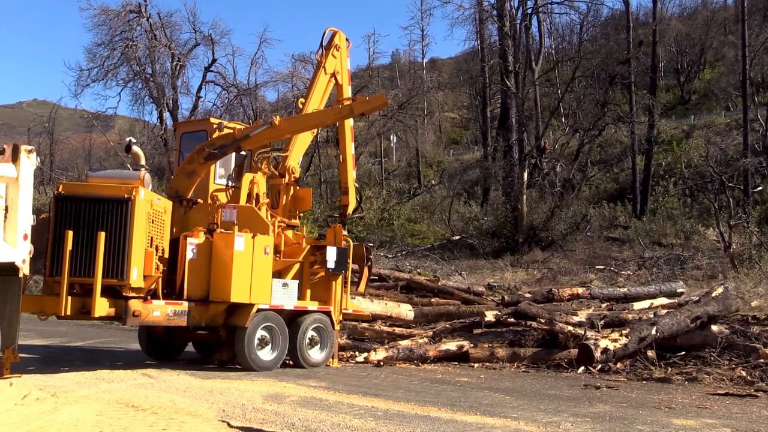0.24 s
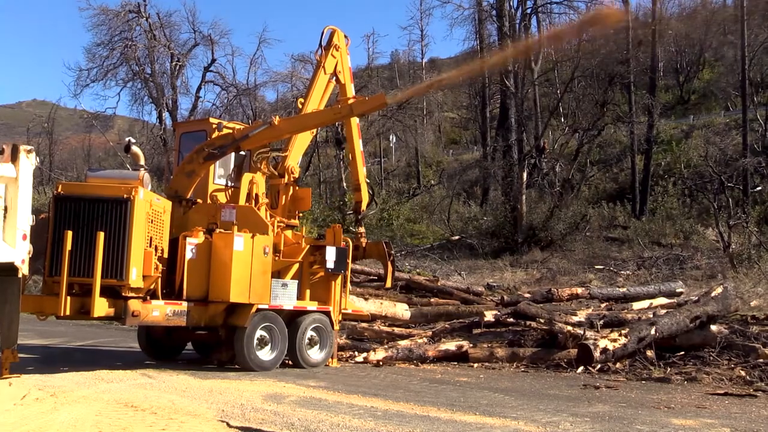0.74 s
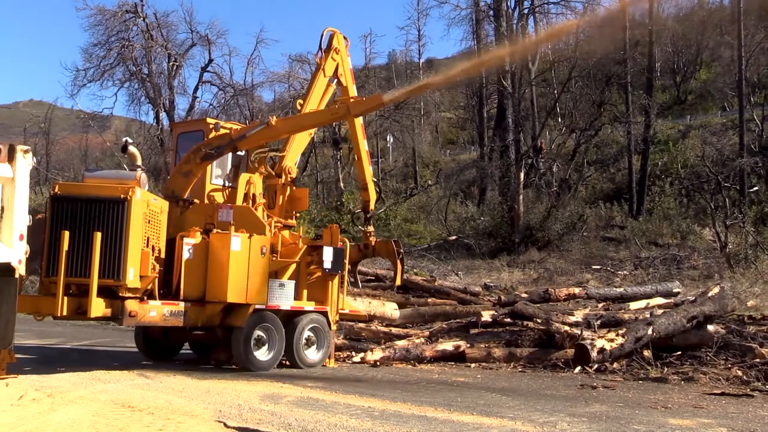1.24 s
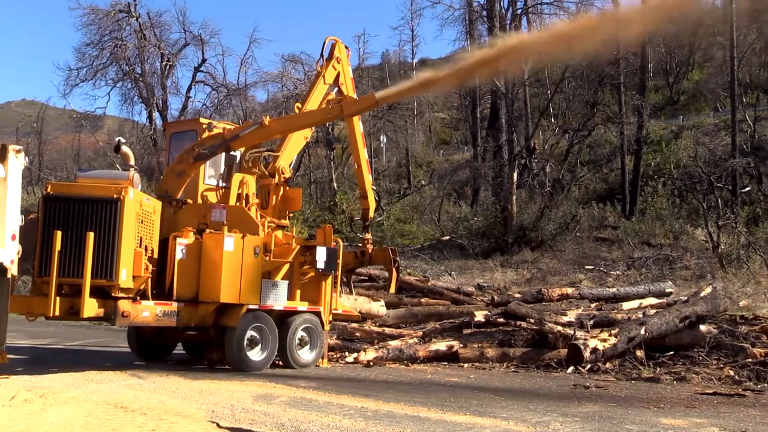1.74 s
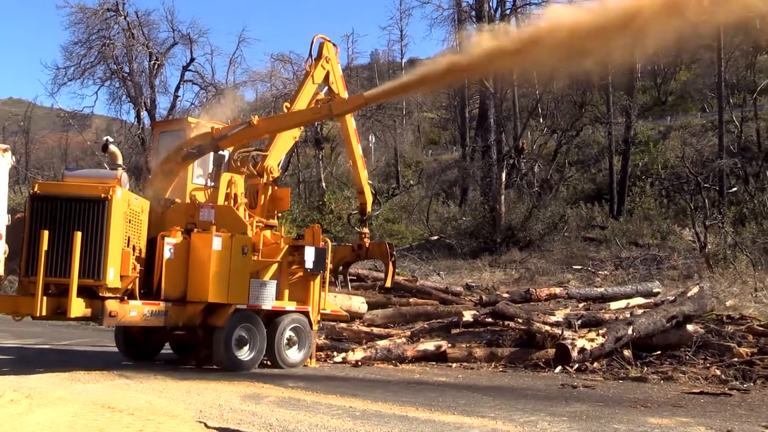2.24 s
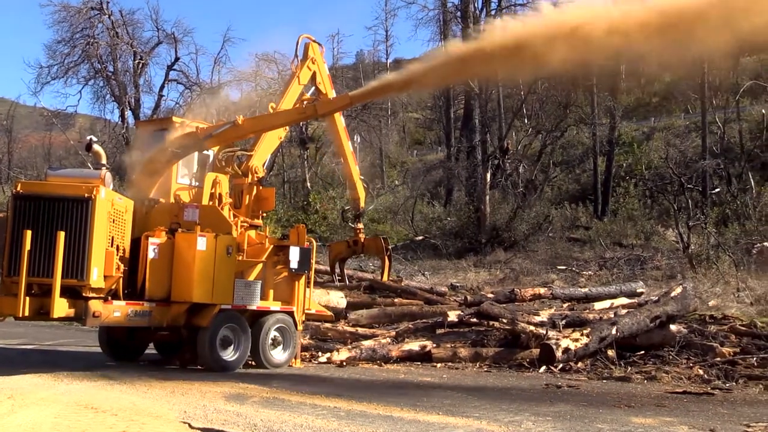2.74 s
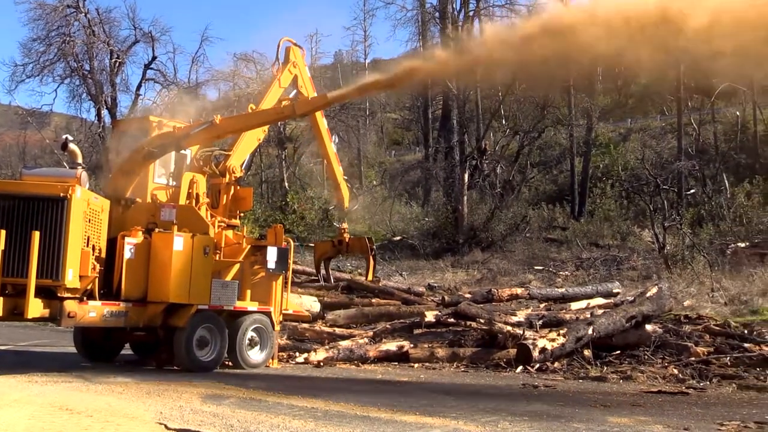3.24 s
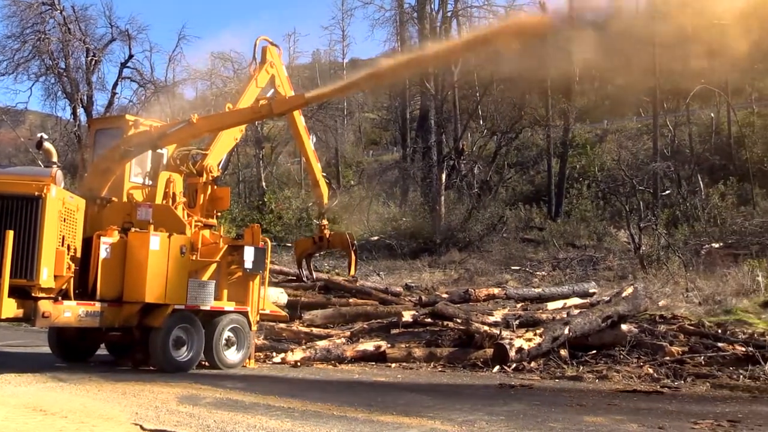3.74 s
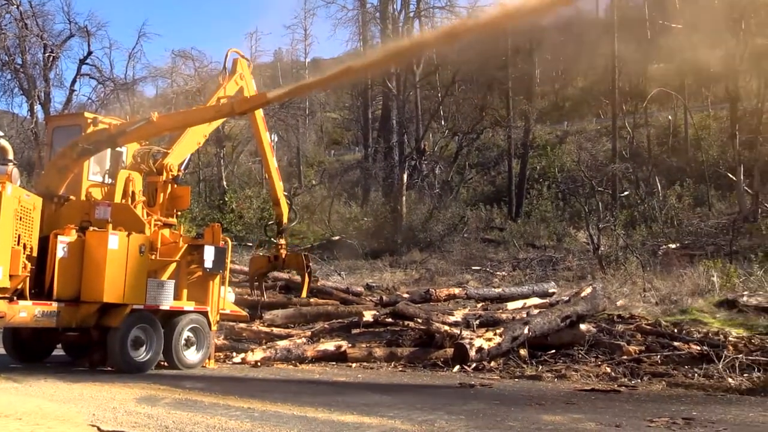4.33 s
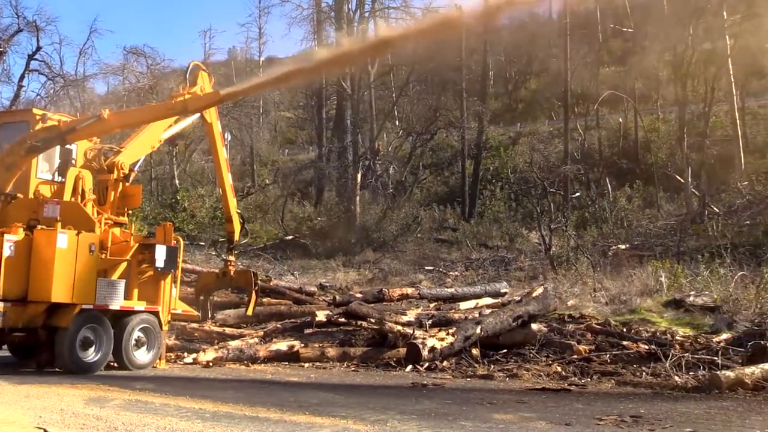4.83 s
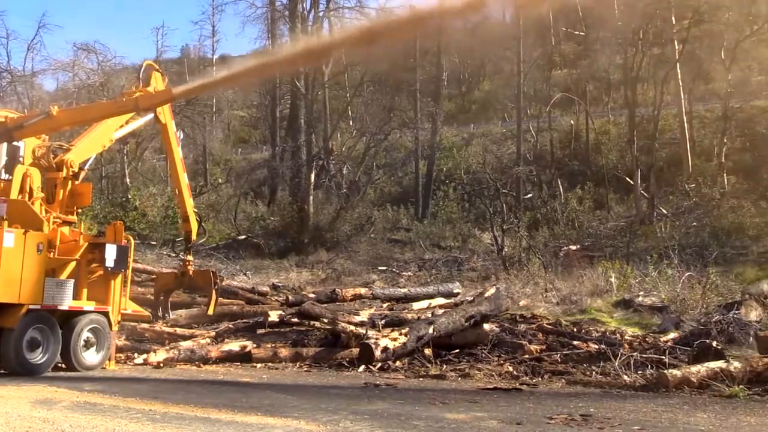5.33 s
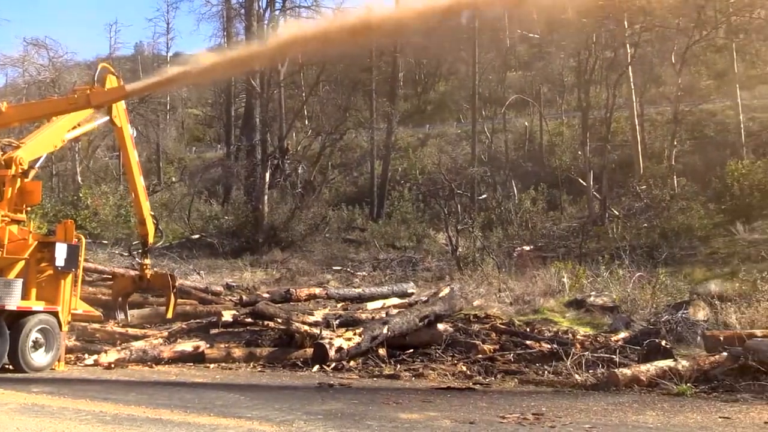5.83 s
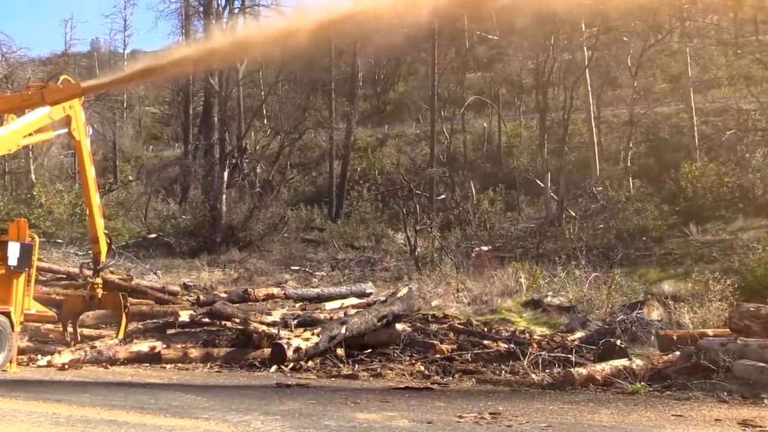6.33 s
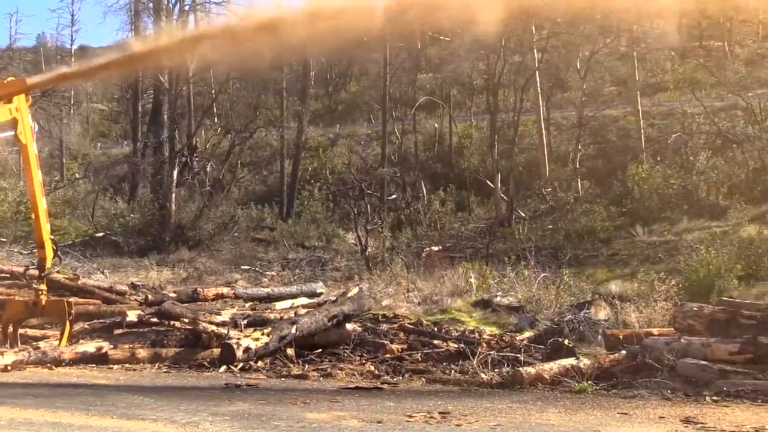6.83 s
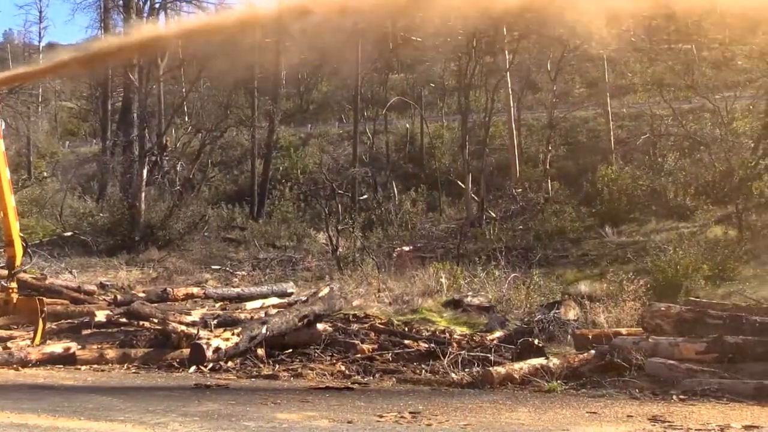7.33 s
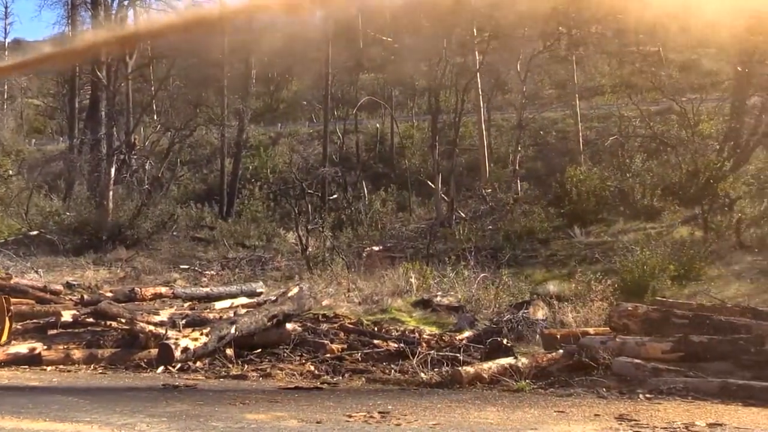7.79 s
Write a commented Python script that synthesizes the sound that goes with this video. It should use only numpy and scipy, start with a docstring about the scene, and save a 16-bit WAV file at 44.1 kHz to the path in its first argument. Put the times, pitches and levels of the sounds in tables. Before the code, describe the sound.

A heavy diesel wood chipper is already roaring at full power, outdoors and left of a stereo microphone. The sound is a dense, midrange-heavy rush of air and chips, with rapid engine throb, constant small ticks and steel rattle. At 0.3-0.5 seconds hard lumps knock the housing with short metallic rings; another clank comes near 1.75. A faint turbo whistle climbs during the first 2.7 seconds. Around 2 a low frame groan swells, and more knocks strike at 2.5-2.7. Bass fills out through the middle. From about 3 the microphone turns steadily away, the engine pitch sags, and drum growl and knife throb grow. Small clanks come near 4.5, with brief chip surges afterward. A short low groan swells at 6.5. After 7 the bass thins sharply; crisp treble bursts crackle at 7.5-8, the roar never stopping.

```python
"""Diesel wood chipper under load

Left of a stereo microphone that slowly turns away: noise streams with firing and knife throb make the roar.
Wandering tones at crankshaft orders make the engine and fan hum; blurred gliding tones, the turbo whistle.
Struck modes ring the steel housing; short tones are the frame's groans.
A wind filter, a moving high-pass with a mono bass bypass, makes the bass swell and thin."""
import sys
import numpy as np
from scipy import signal
from scipy.io import wavfile
from scipy.ndimage import uniform_filter1d

SR = 44100
rng = np.random.default_rng(int(sys.argv[2]) if len(sys.argv) > 2 else 0)


def generate_wav(sig):
    """Save sig (samples, or channels by samples) to the path in sys.argv[1] as 16-bit PCM at SR."""
    pcm = np.round(np.clip(np.atleast_2d(sig).T, -1, 1) * 32767).astype(np.int16)
    wavfile.write(sys.argv[1], SR, pcm)


N = 355313

# Engine speed. Each row: time in seconds, firings per second.
ENGINE_SPEED = [(0, 109), (.7, 107.4), (1.5, 103.5), (2, 102.1), (2.5, 101.7), (3, 102.6), (3.55, 104.3),
                (4, 102.4), (4.5, 100.8), (5, 98.8), (5.5, 96.2), (6, 93.7), (6.5, 92), (7, 90.3),
                (8.06, 86.5)]
# Microphone turn. Each row: time in seconds, share turned away 0-1.
MIC_TURN = [(0, 0.04), (2, 0.04), (3.3, 0.27), (4.3, .5), (5.2, 0.66), (6.4, 0.88), (8.06, 1)]

# Hum line pitches, in cycles per crankshaft turn.
HUM_ORDERS = [3, 3.9, 4.5, 6, 6.5]
# Hum line levels. Each row: top level in dB, loudest time in seconds, fall 2 s either side in dB, wander in Hz.
HUM_LINES = [(-69.5, 4.7, 11, 2.2), (-68.5, 1.46, 33, 1.3), (-61, 3.4, 5, 4.3), (-61, 3.1, 2, 1.6),
             (-56, 2, 3, 4)]
# Frame groans. Each row: peak time in seconds, pitch in Hz, level in dB, 1/e half-length in seconds.
GROANS = [(.75, 168, -61, 0.32), (1.3, 163, -60, .15), (2.033, 159.5, -51.5, 0.19), (2.0, 188, -55, .15),
          (4.85, 183.6, -59, .15), (6.5, 166.7, -61, .15)]
# Turbo whistles, one list each. Each row: time in seconds, pitch in Hz, level in dB.
WHISTLES = [
    [(0, 12200, -77), (.25, 12400, -75), (.5, 12700, -80), (.7, 12850, -75), (.95, 13050, -72),
     (1.2, 13450, -73), (1.5, 14100, -74), (1.75, 14700, -86)],
    [(1.45, 9100, -75), (1.6, 9300, -65), (1.75, 9600, -71), (1.9, 9950, -84), (2.1, 10400, -70),
     (2.25, 10700, -78), (2.5, 11150, -69), (2.62, 11350, -78), (2.75, 11500, -72), (3.1, 11700, -83),
     (4.5, 11600, -85)],
]

# Wood lumps knocking the housing. Each row: time in seconds, level in dB before each mode's random share.
CLANGS = [(.305, -35), (.342, -32), (.45, -37), (.483, -33), (1.746, -30), (2.515, -34), (2.6, -34),
          (2.74, -38), (4.435, -39), (4.55, -36)]
# Housing modes. Each row: pitch in Hz, level in dB re the knock, 60 dB decay time in seconds.
HOUSING_MODES = [(785, -14, .08), (1381, 3, 0.095), (1703, -1.5, 0.12), (2050, -1.5, 0.082),
                 (2424, -16, 0.066), (3240, -6, .05)]
# Sharp treble bursts, and one slight dip (negative).
# Each row: start in seconds, treble change at the start in dB, decay in seconds.
TREBLE_BURSTS = [(1.805, -1, .03), (7.544, 8, .022), (7.615, 3, .04), (7.78, 5, .015), (7.985, 5, .025)]

# Load. Each row: time in seconds, roar in dB re ROAR_DB, treble chip stream and low drum growl in dB re the roar.
LOAD = [(0, 0.5, -5, -2.5), (.3, 0, -0.5, -0.5), (1.0, 1, 1, -1), (1.4, 0, 0.5, -2), (1.7, -0.5, 0.5, -0.5),
        (2.0, -1.1, 0, 1), (2.2, -0.3, 0.5, -0.3), (2.6, -0.5, 2, 0), (2.95, -1, -0.3, 1.5),
        (3.95, -0.1, 0.6, 2.2), (4.15, -0.5, 2.5, 3), (4.6, 0, 1.5, 3.5), (5.1, -0.7, 2, 4.5),
        (5.4, -1.4, 2, 4), (6.1, -2, 1.5, 4.5), (6.4, -0.5, 1, 1.5), (7.2, -0.85, 1.6, 3.5),
        (8.06, -0.5, 0, 3.5)]
# Knife bites, chip clumps and dips (negative). Each row: peak time in seconds, centre in Hz,
# 1/e half-width in octaves, level in dB, 1/e half-length in seconds.
SURGES = [(0.333, 1770, 1.2, 4, 0.05), (0.475, 1800, .5, 4.5, 0.04), (1.82, 9000, 2.7, 4, .04),
          (2.05, 160, 0.24, 11, 0.3), (2.53, 1900, 0.91, 3, 0.032), (2.62, 2500, 2, 1.5, 0.16),
          (1.0, 1900, 1, 0.5, 0.068), (2.165, 3000, 0.72, 2, .015), (3.65, 1500, 0.72, 3.5, .02),
          (4.723, 2600, 1.1, 2, .03), (4.827, 1500, 1.4, -2.5, 0.018), (5.22, 2000, 1.1, 2, .02),
          (7.53, 300, 0.57, -3, 0.091), (1.4, 350, .4, -1, .3), (1.7, 3280, .4, 4, 0.027),
          (1.75, 1900, .5, 0.5, 0.021), (3.426, 2500, 2.2, 1.5, 0.02), (3.697, 3200, 0.71, 0, .06),
          (3.214, 700, 0.2, 8, 0.027), (4.436, 1800, 0.33, 9, 0.012), (4.527, 700, 0.82, 3, 0.026),
          (4.997, 625, 0.3, 5, 0.03), (5.197, 536, 0.31, 6.5, 0.054), (5.805, 1970, .6, 5, 0.023),
          (6.287, 2200, 1.7, 3.5, 0.034), (6.55, 165, .3, 10, 0.091), (7.388, 2500, 1.4, 4, .015),
          (7.55, 2500, 1.3, 4, 0.022), (7.61, 2900, .8, 2.5, 0.03), (7.852, 2500, 2, -1.5, 0.017),
          (7.999, 2460, 0.5, 6.5, 0.02)]
# Roar at the two ports, per microphone direction. Each row: frequency in Hz, left level in dB re ROAR_DB,
# left minus right in dB, likeness of the ports 0-1, left lead in radians.
FACING = [(686, 1.5, 10, 0.79, 2.85), (936, 0, 13.5, 0.03, 3.9), (1030, -2.5, 4.5, 0.4, 0.24),
          (1196, -1.0, 6.0, 0.24, 1.72), (1960, -1, 12, 0.42, 6), (2550, -5, 12, 0.38, 6.4),
          (3330, -6.5, 7, 0.74, 6.6), (3800, -9.5, 3.5, 0.74, 6.9), (3840, -15.5, 5, 0.59, 5.9),
          (4130, -17.5, -0.5, 0.9, 7.3), (4480, -16.5, 2, 0.56, 8.14), (5300, -18.5, 5.0, 0.64, 8.3),
          (5540, -19.5, 9, 0.6, 9.7), (5950, -18, 8, 0.5, 5.4), (6130, -21.0, 7.5, 0, 7.5),
          (8240, -25.5, 6, 0.56, 8.1), (8530, -25.5, 7, 0.4, 8.9), (9040, -26.5, 12, 0.11, 6.2),
          (9500, -30.5, 5, 0.4, 7.5), (12490, -39.5, 4.0, 0.27, 8.6), (12660, -37, 6.0, 0.13, 8.7),
          (14130, -43.0, 0.5, 0.47, 9.2), (14990, -55, -0.5, 0.27, 9.2)]
HALF_TURNED = [(705, 1.5, 12.5, 0.94, 2.85), (950, -2.5, 9.5, 0.29, 3.5), (1120, -1.0, 8.0, 0.62, 1.7),
               (1210, -0.5, 9.5, 0.79, 2.2), (1900, -2, 10.5, 0.53, 5.0), (2500, -3, 15.5, 0.28, 6.6),
               (3010, -4.5, 11, 0.61, 7), (3330, -5.0, 9, 0.55, 6.4), (3630, -8, 7.5, 0.61, 6.3),
               (4090, -16, 0.5, 0.59, 7.8), (4360, -16.5, 2.5, 0.93, 8.3), (5000, -16.0, 6, 0.67, 8.4),
               (5340, -20, 5, 0.84, 8.5), (5700, -19, 9, 0.47, 9.5), (5940, -18.0, 9.5, 0.19, 9.4),
               (6370, -21, 9, 0.27, 7.5), (8530, -22.5, 9.0, 0.43, 8.4), (8870, -22, 11.5, 0.13, 9.1),
               (9600, -29.5, 5.0, 0.38, 8.3), (12400, -37, 2.0, 0.48, 9.5), (13090, -36.0, 4.0, 0.4, 9.5),
               (13610, -40.0, 1.5, 0.39, 9.5), (14990, -48.0, -0.5, 0.08, 9.5)]
TURNED = [(686, -1.5, 8, 0.92, 2.97), (1030, -4, 9.5, 0.89, 1.9), (1290, 0, 6, 0.92, 3.1),
          (1610, -5, 6.5, 0.78, 3.05), (1870, -2, 7.5, 0.77, 4.3), (2330, -2.5, 17.5, 0.11, 2.9),
          (2760, -3.0, 14, 0.41, 9.4), (2900, -3, 14, 0.8, 7.1), (3530, -7.5, 12.5, 0.55, 8),
          (3930, -11.5, 2, 0.95, 8.1), (4560, -15, 2.5, 0.88, 9.2), (5700, -21.5, 2.0, 0.86, 9.8),
          (6060, -17, 8, 0.77, 10.7), (6700, -22, 9.5, 0.65, 10.8), (7100, -17.5, 11, 0.6, 9.7),
          (8760, -23, 9, 0.59, 10), (9470, -27, 7.0, 0.49, 9.8), (10420, -31, 8.0, 0.54, 9.9),
          (10850, -34.0, 4.0, 0.45, 9.0), (11200, -37, -3, 0.41, 11), (11890, -35.5, 0, 0.41, 11.1),
          (14470, -45, 1, 0.28, 12.6), (14990, -46.5, 1.0, 0.54, 12.6)]
# Low end shared by all three directions, same columns.
BASS = [(80, -33, 1.1, .65, .9), (119, -34, 3, .7, 2.02), (155, -8, 4.2, 0.83, 1.4),
        (201, -16, 7.2, 0.73, 2.86), (351, -13, 6.6, 0.95, 2.1), (565, -3, 7.8, 0.88, 2.24)]

# Wind filter. Each row: time in seconds, left and right corners in octaves above 100 Hz, mono bass in dB.
WIND_CUT = [(0, 2.53, 2.56, -17), (.45, 2.35, 2.28, -14.5), (1.1, 2.08, 1.8, -12), (1.67, 1.8, 1.54, -10.5),
            (2.58, 1.48, 0.95, -9.5), (3.45, 1.2, 0.81, -11), (4.08, 0.85, 1, -13), (5.3, 0.59, 1.03, -14),
            (6.66, 1.6, 1.1, -11), (7.18, 2.53, 2.3, -18), (7.62, 2.48, 2.15, -17.5)]
# Colour of the mono bass. Each row: frequency in Hz, level in dB re the mono bass, phase in radians.
BYPASS = [(40, -1, -0.29), (101, 6.5, 0.97), (175, -0.5, 0.3), (280, 6, 0.12), (418, -3.5, -0.79),
          (770, -21, -0.96)]

HOP, FRAME = 256, 1024  # samples
HUM_PAN_DB, HUM_LEAD_RAD = 11, 0.95  # left minus right, left leads
HUM_STEADY = 7  # steady part over wandering part
FAN_OVERTONE_DB, FAN_TURNED_DB = -56, -14  # level, change at full turn
LUMPS_PER_S, LUMPS_DB = 60, -49.5  # small lumps: rate, lowest level before each mode's random share
KNIFE_HZ, KNIFE_DEPTH_FACING, KNIFE_DEPTH_TURNED = 23.2, .03, .09  # depths are rms
KNOCK_ABOVE_HZ, KNOCK_DEPTH, KNOCK_DECAY_FIRINGS = 4000, 0.27, .12  # treble burst per firing
ROAR_DB = -23.5
FLUTTER = 0.02  # rms share by which moving air shakes the lead between ports
STEP_S = 0.15  # slide between wind filter settings
EDGE_HZ = 15600


def gain_of(db):
    """Decibels to amplitude."""
    return 10 ** (np.asarray(db) / 20)


def evened(x):
    """Scales to rms 1."""
    return x / np.sqrt(np.mean(abs(x) ** 2) + 1e-20)


def columns(rows, at, warp=lambda v: v):
    """Every column after the first, interpolated at the given places."""
    key, *rest = np.transpose(rows)
    return np.array([np.interp(warp(at), warp(key), c) for c in rest])


def steps(rows, at):
    """Every column after the first, held from row to row with a quick slide between."""
    rows = np.array(rows)
    slid = np.clip((at - rows[1:, :1]) / STEP_S + .5, 0, 1)
    return rows[0, 1:, None] + np.diff(rows[:, 1:], axis=0).T @ slid


def to_frames(x):
    """Frequencies, times and short-time spectrum."""
    return signal.stft(x, SR, nperseg=FRAME, noverlap=FRAME - HOP)


def to_sound(z):
    """Short-time spectra back to samples."""
    return signal.istft(z, SR, nperseg=FRAME, noverlap=FRAME - HOP)[1][..., :N]


def wavering(hz, blur_hz, steady=2.5):
    """Complex tone along the curve hz, real part of rms 1; narrowband noise makes level and phase wander."""
    r = np.exp(-np.pi * blur_hz / SR)
    noise = rng.standard_normal(N) + 1j * rng.standard_normal(N)
    wander = evened(signal.lfilter([1], [1, -2 * r, r * r], noise))
    carrier = np.exp(2j * np.pi * np.cumsum(hz) / SR)
    return np.sqrt(2) * evened((steady + wander) * carrier)


def groans(t):
    """Frame groans under load: short tones with Gaussian swell and fade."""
    out = 0
    for at, hz, db, long in GROANS:
        out = out + gain_of(db) * np.sqrt(2) * np.exp(2j * np.pi * hz * t - ((t - at) / long) ** 2)
    return out


def hum(t):
    """Crankshaft orders of exhaust and cooling fan, three firings a turn, plus the groans."""
    shaft_hz = columns(ENGINE_SPEED, t)[0] / 3
    left = groans(t)
    for order, (top_db, at, fall_db, blur_hz) in zip(HUM_ORDERS, HUM_LINES):
        level_db = top_db - fall_db * ((t - at) / 2) ** 2
        left = left + gain_of(level_db) * wavering(order * shaft_hz, blur_hz, steady=HUM_STEADY)
    right = gain_of(-HUM_PAN_DB) * np.exp(-1j * HUM_LEAD_RAD) * left
    return np.array([left, right]).real


def fan_overtone(t):
    """Fan tone tied to engine speed, shaded as the microphone turns away."""
    db = FAN_OVERTONE_DB + FAN_TURNED_DB * columns(MIC_TURN, t)[0]
    return gain_of(db) * wavering(columns(ENGINE_SPEED, t)[0] * 13 / 3, 2.5).real


def turbo(t):
    """Turbocharger spool-up: blurred climbing whistles, the upper one a broad hiss."""
    out = np.zeros(N)
    for rows, blur_hz in zip(WHISTLES, (280, 85)):
        hz, db = columns(rows, t)
        sounding = (t >= rows[0][0]) * (t <= rows[-1][0])
        out += gain_of(db) * sounding * wavering(hz, blur_hz, .2).real
    return out


def housing():
    """Large knocks and a patter of small lumps ring the steel; each hit excites each mode by chance."""
    patter_db = LUMPS_DB + 2.9 * np.minimum(rng.exponential(1, N), 3)
    lumps = (rng.random(N) < LUMPS_PER_S / SR) * gain_of(patter_db)
    for at, db in CLANGS:
        lumps[round(at * SR)] = gain_of(db)
    where = np.flatnonzero(lumps)
    t = np.arange(6000) / SR
    onset = np.minimum(t / .003, 1)
    out = np.zeros(N)
    for hz, db, t60 in HOUSING_MODES:
        hits = np.zeros(N)
        hits[where] = lumps[where] * rng.uniform(0.21, 1.8, len(where))
        ring = gain_of(db - 60 * t / t60) * onset * np.sin(2 * np.pi * hz * t)
        out += signal.oaconvolve(hits, ring)[:N]
    return out


def clatter(t):
    """Two unrelated streams of rushing air and chips ticking on steel, throbbing with firings and drum."""
    firing_phase = np.cumsum(columns(ENGINE_SPEED, t)[0]) / SR % 1
    away = columns(MIC_TURN, t)[0]
    chop_depth = KNIFE_DEPTH_FACING + away * (KNIFE_DEPTH_TURNED - KNIFE_DEPTH_FACING)
    chop = chop_depth * wavering(KNIFE_HZ + 0 * t, 3.1, steady=1).real
    throb = 1 + 0.13 * np.exp(-firing_phase / 0.5) + chop

    ticks = gain_of(2.55 * np.minimum(rng.exponential(1, (2, N)), 4))
    ticks = ticks * (rng.random((2, N)) < 2500 / SR)  # ticks per second
    ticks = ticks * rng.choice([-1., 1.], (2, N))
    air = rng.standard_normal((2, N))
    streams = throb * (air + 0.3 * evened(ticks))

    high_pass = signal.butter(2, KNOCK_ABOVE_HZ, "high", fs=SR, output="sos")
    treble = signal.sosfilt(high_pass, streams)
    knock = np.exp(-firing_phase / KNOCK_DECAY_FIRINGS)
    bursts = 0
    for at, db, decay in TREBLE_BURSTS:
        bursts = bursts + (gain_of(db) - 1) * (t > at) * np.exp(-abs(t - at) / decay)
    return streams + (KNOCK_DEPTH * (knock - knock.mean()) + bursts) * treble


def load_db(hz, s):
    """Level over pitch and time: chips rule the treble and come in clumps, the drum rules the low end."""
    roar_db, chips_db, growl_db = columns(LOAD, s)
    octave = np.log2(hz[:, None] + 1)
    treble = np.clip(octave - np.log2(2500), 0, 1)
    low = np.clip((np.log2(1300) - octave) / 1.2, 0, 1)
    clumps = evened(uniform_filter1d(rng.standard_normal(len(s)), size=6))
    patches = uniform_filter1d(rng.standard_normal((len(hz), len(s))), size=3, axis=0)
    patches = evened(uniform_filter1d(patches, size=8, axis=1))
    surges = 0
    for at, centre_hz, wide, db, long in SURGES:
        off_pitch = (octave - np.log2(centre_hz)) / wide
        surges = surges + db * np.exp(-off_pitch ** 2 - ((s - at) / long) ** 2)
    return ROAR_DB + roar_db + treble * (chips_db + 0.5 * clumps) + low * growl_db + 1.22 * patches + surges


def roar(t, tones):
    """Colours the streams by load and microphone direction; tones share the path to the right port."""
    hz, s, z = to_frames(clatter(t))
    away = np.clip(columns(MIC_TURN, s)[0], 0, 1)
    near, half, far = (columns(BASS + rows, hz + 1, np.log)[..., None]
                       for rows in (FACING, HALF_TURNED, TURNED))
    first_half, second_half = np.minimum(2 * away, 1), np.maximum(2 * away - 1, 0)
    left_db, pan_db, same, lead = near + first_half * (half - near) + second_half * (far - half)
    same = np.clip(same, 0, 1)
    level = gain_of(left_db + load_db(hz, s))
    tone = to_frames(tones)[2]
    flutter = evened(uniform_filter1d(rng.standard_normal(len(s)), size=30))
    across = gain_of(-pan_db) * np.exp(-1j * lead * (1 + FLUTTER * flutter))
    right_stream = same * z[0] + np.sqrt(1 - same ** 2) * z[1]
    left = level * z[0] + tone
    right = across * (level * right_stream + tone)
    return to_sound(np.array([left, right]))


def wind_filter(x):
    """Third-order high-pass per side at a moving corner, plus mono bass taken from the left."""
    hz, s, z = to_frames(x)
    *octaves, mono_db = steps(WIND_CUT, s)
    corner_hz = 100 * 2 ** np.array(octaves)[:, None]
    u = 1j * hz[:, None] / corner_hz
    high = u ** 3 / ((u + 1) * (u * u + u + 1))
    colour_db, phase = columns(BYPASS, hz + 1, np.log)[..., None]
    bass = gain_of(colour_db + mono_db) * np.exp(1j * phase) * z[0]
    return to_sound(high * z + bass)


def scene():
    """Roar, whistles, fan overtone and housing share one path; they and the hum pass the wind filter."""
    t = np.arange(N) / SR
    tones = turbo(t) + fan_overtone(t) + housing()
    return wind_filter(roar(t, tones) + hum(t))


def record(dry):
    """Soft overload, low cut, self-noise and band limit."""
    ceiling = .09
    out = dry / (1 + (dry / ceiling) ** 4) ** .25
    out = signal.sosfilt(signal.butter(2, 70, "high", fs=SR, output="sos"), out)
    rumble = signal.lfilter([1], [1, -.985], rng.standard_normal((2, N)))
    out = out + gain_of(-85) * evened(rumble)
    band_limit = signal.firwin(511, EDGE_HZ, window=("kaiser", 9), fs=SR)
    return signal.oaconvolve(out, band_limit[None], "same")


dry = scene()
out = record(dry)
generate_wav(out)
```